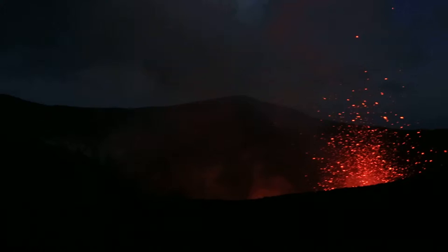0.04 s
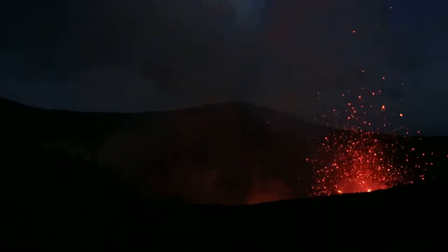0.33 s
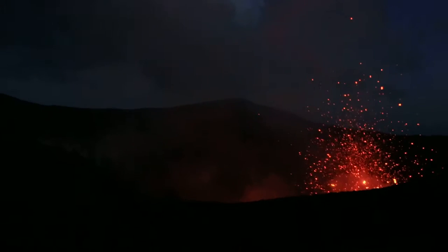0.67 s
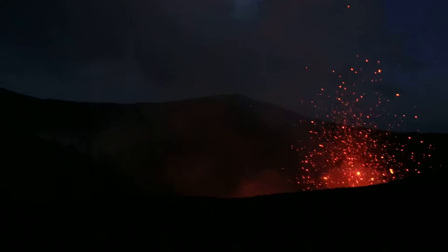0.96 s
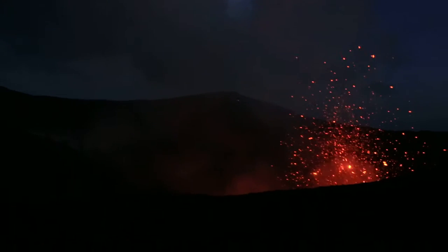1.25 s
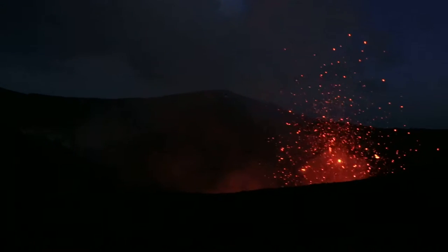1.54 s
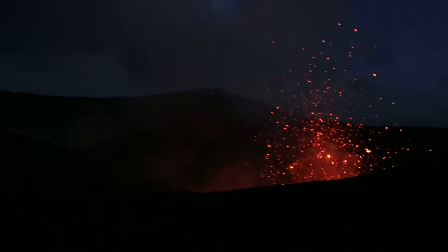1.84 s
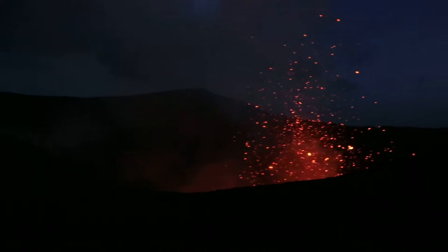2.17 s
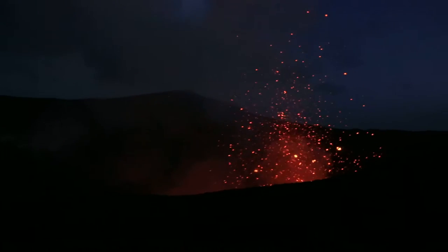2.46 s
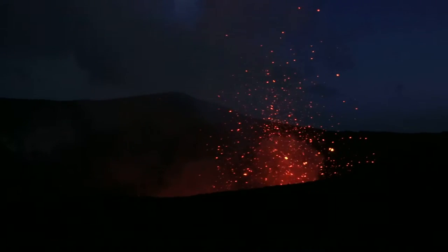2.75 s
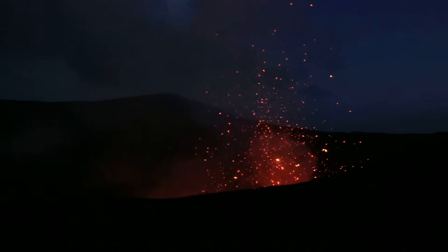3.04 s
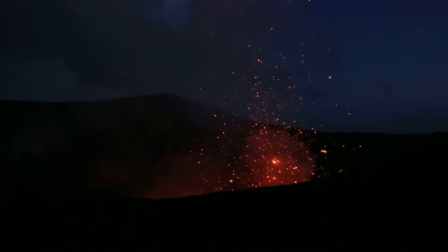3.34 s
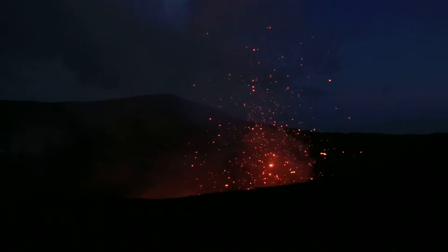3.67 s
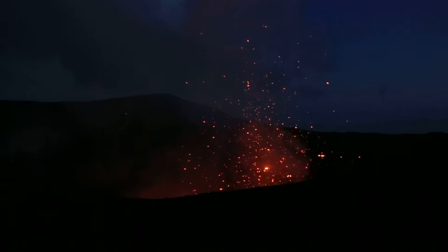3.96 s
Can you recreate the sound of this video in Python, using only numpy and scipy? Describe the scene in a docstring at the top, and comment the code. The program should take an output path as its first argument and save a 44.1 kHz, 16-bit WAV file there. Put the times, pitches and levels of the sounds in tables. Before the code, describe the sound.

A volcanic vent blows out with a sudden roar of gas over a deep rumble and low thuds. The roar holds briefly, then dies away with more thuds and a faint patter of cinders, heard from the crater rim.

```python
"""A sudden roar of gas over a deep rumble: a volcanic vent blows out, heard from the crater rim.
The turbulent jet holds for a second and dies away, while large eddies churn in the vent's throat.
Low thuds, each one short pressure swing, come at the outset and again as the roar fades.
Cinders patter faintly on the far slope and a few dry ticks sound close by.
Under it all lie a faint hiss and a thin electrical whine."""
import sys
import numpy as np
from scipy import signal
from scipy.fft import rfft, irfft
from scipy.io import wavfile
from scipy.ndimage import uniform_filter1d

SR = 44100
rng = np.random.default_rng(int(sys.argv[2]) if len(sys.argv) > 2 else 0)


def master_out(mix):
    """Clip the mix to full scale and print it as 16-bit PCM to the path in sys.argv[1]."""
    frames = np.transpose(np.atleast_2d(mix))
    ceiling = np.clip(frames, -1, 1)
    pcm = np.round(ceiling * 32767).astype(np.int16)
    wavfile.write(sys.argv[1], SR, pcm)


N = 176400

# Envelopes of relative level: time_s, level_db
BACKGROUND_ENVELOPE = [(.07, -2), (.5, -10), (1.0, 1), (4, 1)]
CINDER_ENVELOPE = [(.07, -70), (2.3, -52), (2.8, -53), (2.95, -44.5), (3.08, -55), (3.25, -51), (3.7, -55),
                   (4, -53)]
RUMBLE_ENVELOPE = [(.07, -15.5), (.2, -19), (.45, -18.5), (.7, -19.5), (.85, -18), (1.05, -20.5),
                   (1.25, -24), (1.45, -22.5), (1.55, -27.5), (1.66, -24), (2.0, -32), (2.2, -30.5),
                   (2.5, -32), (2.66, -31.5), (2.76, -36), (3.05, -40.5), (3.22, -38), (3.38, -40),
                   (3.78, -41.5), (3.94, -35), (4, -36.5)]
SUB_BASS_ENVELOPE = [(.07, -23), (.13, -22), (.26, -29), (.48, -21), (.68, -34), (.85, -28.5), (1.15, -28),
                     (1.5, -38.5), (2.1, -38.5), (2.35, -32.5), (2.66, -35), (2.76, -44.5), (3.25, -40.5),
                     (3.45, -43), (4, -42.5)]
# Envelopes of the jet's two bands, each relative: time_s, body_db, hiss_db
JET_ENVELOPE = [(.07, -25, -36), (.2, -27, -37), (.6, -25, -34), (.7, -25.5, -34), (.82, -25, -33),
                (1.02, -26, -36), (1.35, -28.5, -38.5), (1.66, -28.5, -38.5), (1.95, -32, -42.5),
                (2.3, -36, -47), (2.6, -37.5, -47), (2.8, -40, -48), (3.15, -44, -51.5), (3.4, -43, -51),
                (3.78, -46, -55.5), (3.93, -40, -49), (4, -41, -53)]

# Spectral shapes: frequency_hz, gain_db
BACKGROUND_SPECTRUM = [(1800, -29), (3400, 0), (4900, -3), (6000, -6.5), (8000, -9.5), (10300, -11.5),
                       (12700, -13), (14800, -17), (15400, -19), (15700, -11.5)]
CINDER_SPECTRUM = [(400, -25), (1200, 6), (2000, -4), (4300, -7), (6000, -17), (10000, -30), (16000, -50)]
TICK_ROLLOFF = [(9500, 0.5), (15500, -9)]
RUMBLE_SPECTRUM = [(40, -18), (70, -10.5), (95, -1.5), (130, 1), (195, 0), (222, 1.5), (245, 0), (272, -3),
                   (305, -2.5), (345, -8.5), (430, -20), (800, -63.5)]
SUB_BASS_SPECTRUM = [(10, -25), (22, -19), (40, -2.5), (55, -6.5), (72, -1), (90, -9.5), (130, -7.5),
                     (300, -78)]
JET_BODY_SPECTRUM = [(120, -11.5), (300, -6), (380, -1.5), (440, -4.5), (520, -0.5), (610, 1.5), (735, 1),
                     (830, -3), (980, -6), (1200, -4), (1400, -5), (1650, -10.5), (2100, -11.5),
                     (3200, -42), (8000, -80)]
JET_HISS_SPECTRUM = [(800, -21), (1500, -3.5), (2100, 0), (2600, -0.5), (3150, -4.5), (4000, -8.5),
                     (5000, -13), (6300, -22), (8000, -32.5), (10500, -60), (16000, -80)]

# Dry clicks, levels before filtering: start_s, level_db, decay_s, centre_hz, half_width_octaves
TICKS = [(0.262, -30, 0.001, 5000, .6), (0.2926, -13.5, 0.00062, 8000, .75), (.499, -33, .001, 13500, .25),
         (.658, -38, .002, 11500, .2), (.674, -37, .002, 11500, .2), (1.66, -43, .005, 10800, .15),
         (2.105, -44, .002, 12000, .2), (2.137, -39.5, .005, 11300, .16), (2.156, -39, .004, 11500, .22),
         (2.444, -37, 0.0033, 11300, .28), (2.886, -39, .005, 10400, .08), (2.911, -45, .001, 12000, .2),
         (3.401, -36, .004, 12000, .2), (3.419, -37, .002, 12000, .3)]
# Low pressure pulses: centre_s, level_db, pitch_hz
THUDS = [(0.123, -11, 70.5), (0.256, -5.5, 216), (2.28, -16.5, 81), (2.299, -12.5, 139), (2.358, -20, 123),
         (2.625, -17, 138), (2.652, -19.5, 98), (2.677, -18.5, 111), (3.19, -29, 114), (3.241, -27, 130),
         (3.547, -26, 89), (3.772, -28.5, 45.7)]


def amp(db):
    """Amplitude grows tenfold for every 20 dB."""
    return 10 ** (np.asarray(db) / 20)


def unit(x):
    """Normalisation to an rms of 1."""
    return x / np.sqrt(np.mean(x ** 2) + 1e-20)


def envelope(table, column=1):
    """Exponential growth and decay: gain per sample along straight lines in dB."""
    rows = np.array(table)
    return amp(np.interp(np.arange(N) / SR, rows[:, 0], rows[:, column]))


def colour(x, spectrum):
    """Linear filtering: the spectrum of x is multiplied by a gain curve."""
    hz, db = np.transpose(spectrum)
    f = np.fft.rfftfreq(len(x), 1 / SR)
    gain = amp(np.interp(np.log(f + 1), np.log(hz), db))
    return irfft(rfft(x) * gain, len(x))


def wander(rate_hz):
    """Random modulation: noise of rms 1, from 2 Hz up to about the given rate."""
    f = np.fft.rfftfreq(N, 1 / SR)
    band = (f > 2) / (1 + (f / rate_hz) ** 2)
    return unit(irfft(rfft(rng.standard_normal(N)) * band, N))


def steady_noise(spectrum, window_samples=8000):
    """Coloured noise divided by its running rms keeps a steady power."""
    noise = colour(rng.standard_normal(N), spectrum)
    return noise / np.sqrt(uniform_filter1d(noise ** 2, window_samples) + 1e-20)


def add(mix, start_s, sound):
    """Superposition of a delayed sound on the mix."""
    part = mix[max(round(start_s * SR), 0):][:len(sound)]
    part += sound[:len(part)]


def background(whine_hz=15654, waver_db=1):
    """Broadband hiss and an amplitude-modulated electrical whine share one envelope."""
    tone = np.sqrt(2) * np.sin(2 * np.pi * whine_hz * np.arange(N) / SR)
    whine = tone * amp(waver_db * wander(12))
    hiss = steady_noise(BACKGROUND_SPECTRUM)
    return (amp(-55) * hiss + amp(-69.5) * whine) * envelope(BACKGROUND_ENVELOPE)


def cinders(hits_per_s=450, spread_db=3, decay_s=0.0018):
    """Incoherent addition: cinders strike the far slope at random, and their energies sum."""
    t = np.arange(512) / SR
    landings = rng.random(N) < hits_per_s / SR
    strengths = amp(spread_db * np.minimum(rng.exponential(1, N), 4))
    energy = signal.fftconvolve((landings * strengths) ** 2, np.exp(-2 * t / decay_s))[:N]
    patter = np.sqrt(np.abs(energy)) * rng.standard_normal(N)
    return unit(colour(patter, CINDER_SPECTRUM)) * envelope(CINDER_ENVELOPE)


def ticks():
    """A brief transient has a broad spectrum; a band-pass curve gives each tick its own brightness."""
    t, out = np.arange(2048) / SR, np.zeros(N)
    f = np.geomspace(300, 20000, num=120)
    for start_s, level_db, decay_s, centre_hz, half_width_octaves in TICKS:
        click = np.zeros(N)
        add(click, start_s, amp(level_db) * np.exp(-t / decay_s) * rng.standard_normal(len(t)))
        detuning = np.log2(f / centre_hz) / half_width_octaves
        band_db = -10 * np.log10(1 + detuning ** 2)
        out += colour(click, np.c_[f, band_db])
    return amp(-1) * colour(out, TICK_ROLLOFF)


def thuds(width_cycles=0.41, phase_rad=0.72):
    """A gas burst or wind buffet is a pressure pulse: about one cycle under a Gaussian window."""
    t, out = np.arange(N) / SR, np.zeros(N)
    for centre_s, level_db, pitch_hz in THUDS:
        cycles = (t - centre_s) * pitch_hz
        window = np.exp(-(cycles / width_cycles) ** 2 / 2)
        out += amp(level_db) * window * np.cos(2 * np.pi * cycles + phase_rad)
    return out


def rumble(churn_db=1.03):
    """Large eddies turn over slowly, so gas churning in the vent's throat radiates low frequencies."""
    eddies = steady_noise(RUMBLE_SPECTRUM) * envelope(RUMBLE_ENVELOPE)
    churn = amp(churn_db * wander(20))
    sub_bass = steady_noise(SUB_BASS_SPECTRUM) * envelope(SUB_BASS_ENVELOPE)
    return eddies * churn + sub_bass


def jet(flutter_db=0.1, sputter_db=0.68):
    """Turbulent gas radiates broadband noise: body and hiss flutter together, and the hiss sputters."""
    body = steady_noise(JET_BODY_SPECTRUM) * envelope(JET_ENVELOPE, column=1)
    hiss = steady_noise(JET_HISS_SPECTRUM) * envelope(JET_ENVELOPE, column=2)
    sputter = amp(sputter_db * wander(130))
    flutter = amp(flutter_db * wander(15))
    return (amp(1.32) * body + amp(0.6) * hiss * sputter) * flutter


def scene():
    """Superposition: the pressures of all sources add at one point on the rim."""
    return (rumble() + jet() + thuds() + cinders() + ticks() + background())[None]


def record(dry, start_s=0.071, rise_s=0.0015, cutoff_hz=15900):
    """Gating and band limiting: the sound starts abruptly and loses its highest treble."""
    gate = np.clip((np.arange(N) / SR - start_s) / rise_s, 0, 1)
    lowpass = signal.firwin(1023, cutoff_hz, window=("kaiser", 9), fs=SR)
    return signal.oaconvolve(dry * gate, lowpass[None], "same")


dry = scene()
out = record(dry)
master_out(out)
```